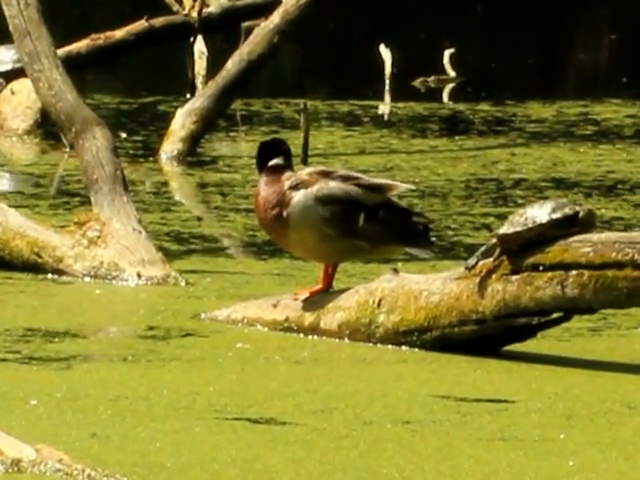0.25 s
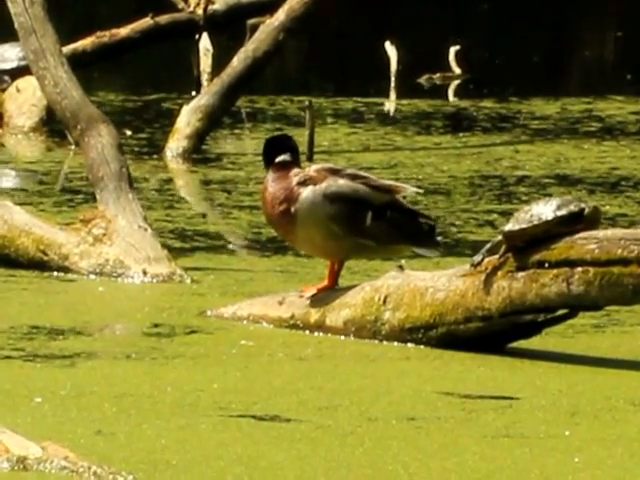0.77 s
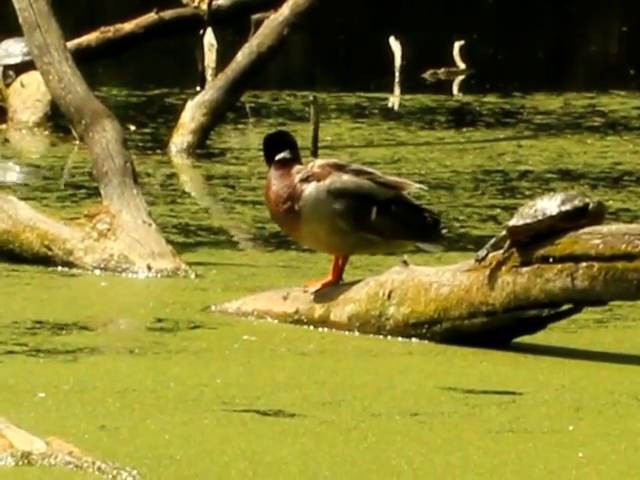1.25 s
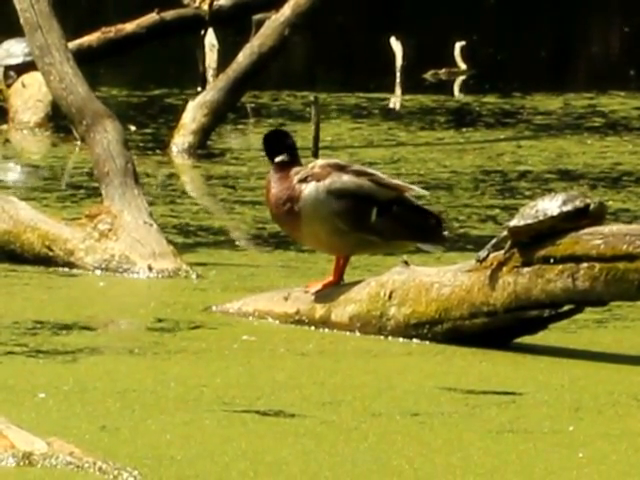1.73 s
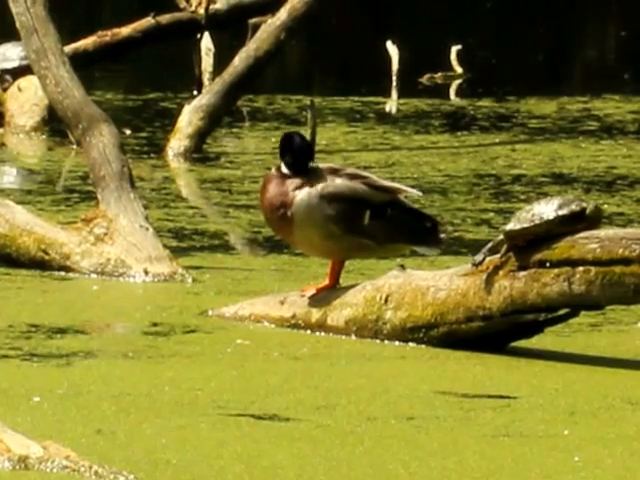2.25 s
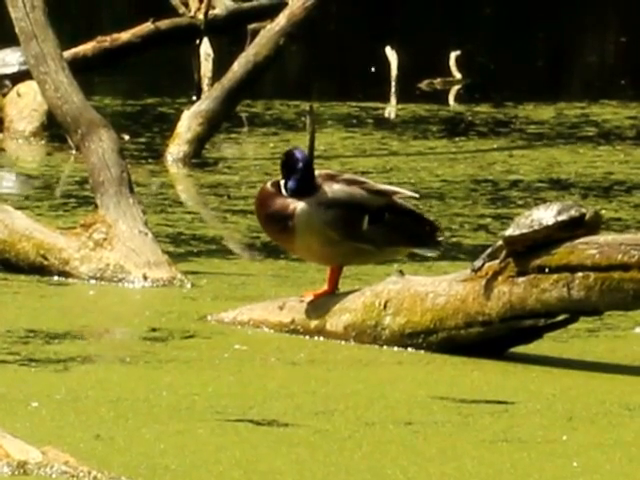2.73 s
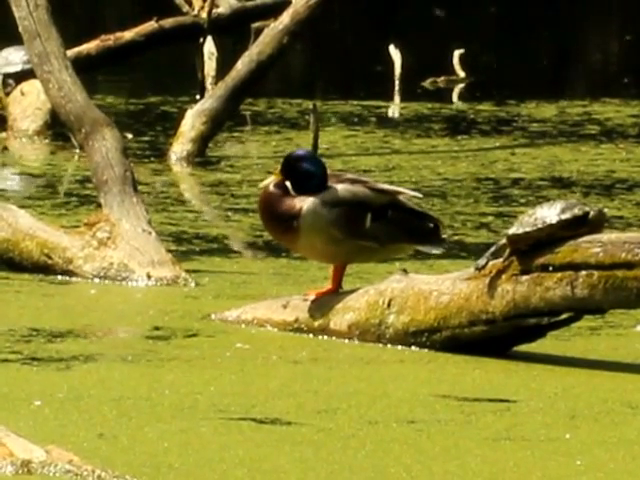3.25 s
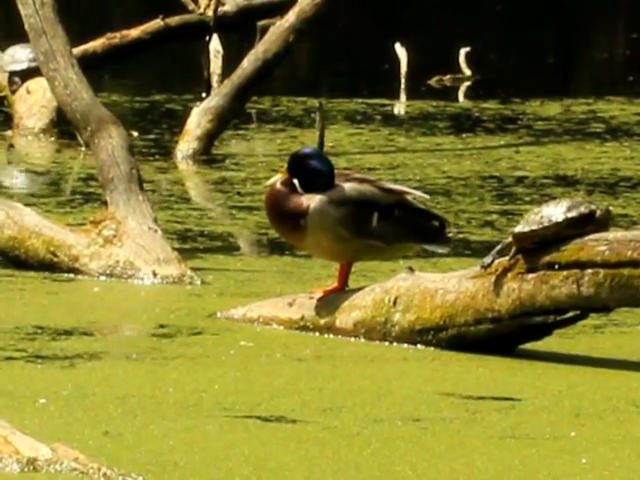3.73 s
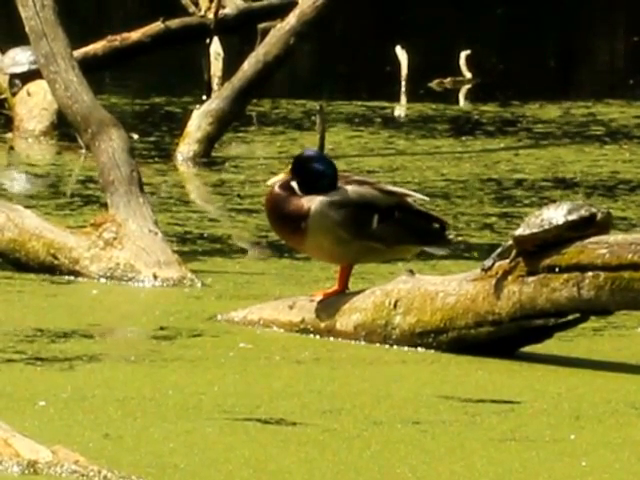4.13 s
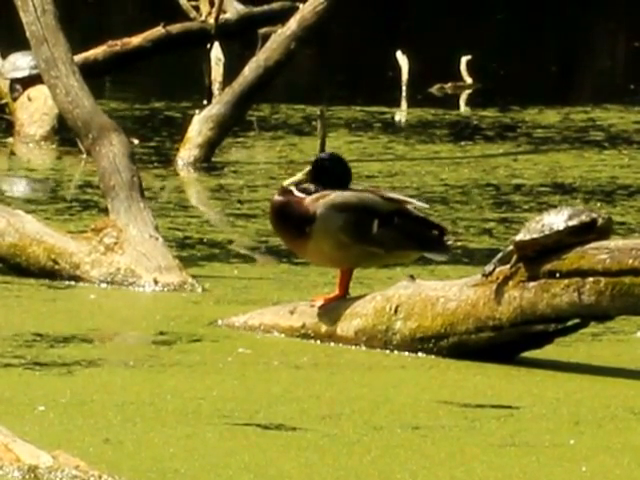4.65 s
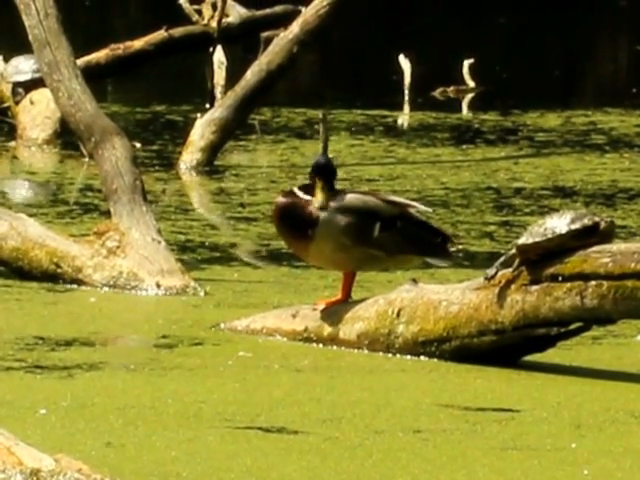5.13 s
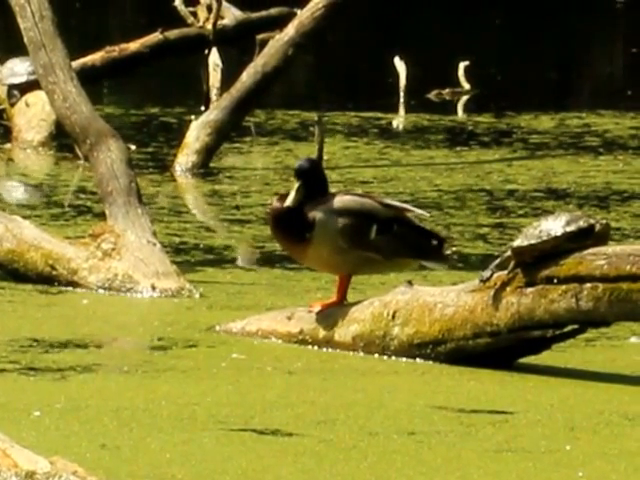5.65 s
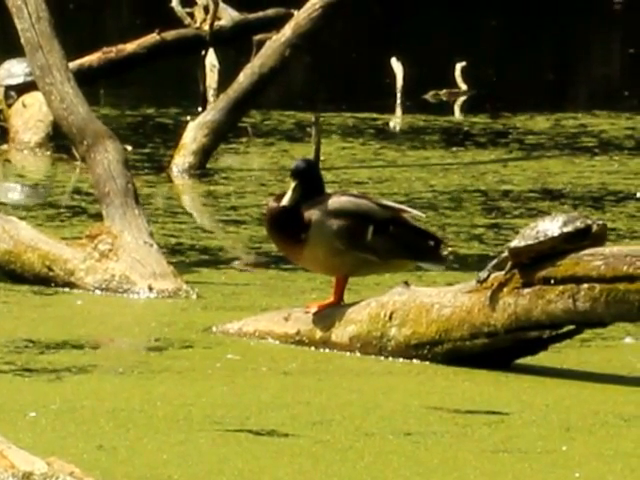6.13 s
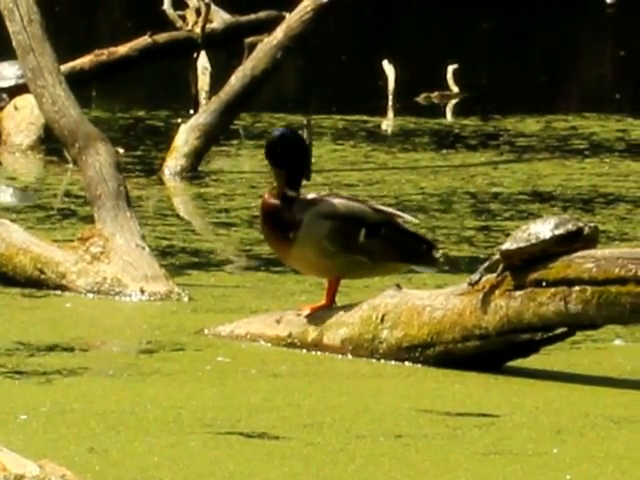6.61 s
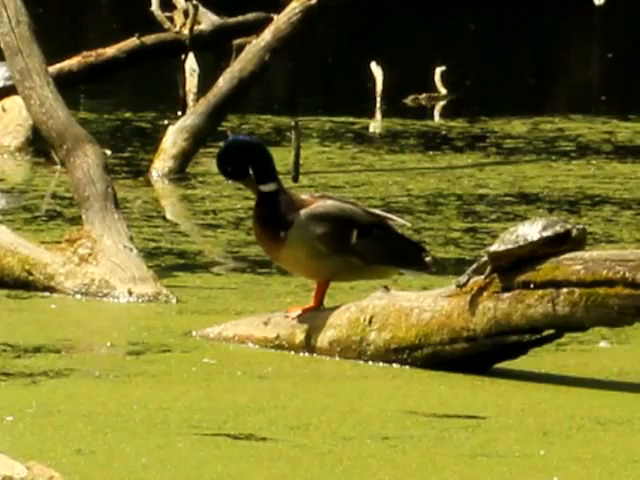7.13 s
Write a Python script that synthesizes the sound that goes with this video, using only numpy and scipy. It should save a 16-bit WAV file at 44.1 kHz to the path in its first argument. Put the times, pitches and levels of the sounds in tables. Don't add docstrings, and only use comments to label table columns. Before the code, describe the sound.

At a quiet wooded pond, several songbirds give quick bright chirps and sliding whistles in bursts with gaps between. A water bird utters a very short nasal call about once a second. A close insect begins faintly and becomes a regular dry rasp. Light wind rumbles and bumps the microphone early on, over soft leaf hiss. Notes echo briefly among trees.

```python
import sys
import numpy as np
from scipy import signal
from scipy.fft import rfft, irfft, next_fast_len
from scipy.io import wavfile
from scipy.ndimage import uniform_filter1d, map_coordinates

SR = 44100
rng = np.random.default_rng(int(sys.argv[2]) if len(sys.argv) > 2 else 0)


def to_wav(sig):
    pcm = np.clip(np.atleast_2d(sig), -1, 1) * 32767
    pcm = np.round(pcm).astype(np.int16)
    wavfile.write(sys.argv[1], SR, pcm.T)


def boost(x):
    u = np.asarray(x, float) / 20
    return 10 ** u


N = 325017


def unit(x):
    return x / np.sqrt(np.mean(x ** 2) + 1e-20)


def along(points, hz):
    f, v = np.transpose(points)
    return np.interp(np.log(hz + 1), np.log(f + 1), v)


def noise(spectrum):
    m = next_fast_len(N)
    white = rfft(rng.standard_normal(m))
    gain = boost(along(spectrum, np.fft.rfftfreq(m, 1 / SR)))
    return unit(irfft(white * gain, m)[:N])


def wobble(rate, size=N):
    knots = rng.standard_normal(int(size * rate / SR) + 4)
    return map_coordinates(knots, [np.arange(size) * rate / SR])


def silence():
    return np.zeros(N + 2 * SR)


def add(track, s, x):
    track[round((s + 1) * SR):][:len(x)] += x


def swell(u, rise, fall):
    ramp = np.minimum(u / rise, (1 - u) / fall)
    return np.sin(np.pi / 2 * np.clip(ramp, 0, 1)) ** 2


# frequency_hz [Hz], density_db [dB per Hz]
AIR_SPECTRUM = [(180, -6), (300, -11), (348, -7.5), (879, 3), (1490, -2), (1620, -3.5), (2220, -6.5),
                (3770, -1.5), (4090, -5.5), (5420, -9), (13500, -17.5), (15600, -21.5)]


def leaf_hiss():
    return boost(-70 + 0.5 + 0.4 * wobble(2.4)) * noise(AIR_SPECTRUM)


# time_s [s], level_db [dB]
GUST_LEVELS = [
    (0.0, -62),
    (0.1, -65),
    (1.39, -67),
    (1.641, -72.5),
    (4.719, -69),
    (7.12, -75),
    (7.37, -67),
]
# frequency_hz [Hz], density_db [dB per Hz]
RUMBLE_SPECTRUM = [(13, -49.5), (22, -45.5), (31, -12.5), (76, 1), (144, 0.5), (183, -2), (330, -22),
                   (430, -62), (730, -120)]


def wind_rumble():
    time_s, level_db = np.transpose(GUST_LEVELS)
    course = boost(np.interp(np.arange(N) / SR, time_s, level_db) - 0.5)
    eddies = boost(3 * wobble(12))
    return course * unit(eddies * noise(RUMBLE_SPECTRUM))


# centre_s [s], peak_db [dB], pitch_hz [Hz]
PUFFS = [(0.012, -57, 109), (0.041, -38, 105), (0.135, -41.5, 99), (0.209, -49.5, 162),
         (0.2662, -35.5, 127), (0.298, -44, 114), (0.387, -44.5, 118.3), (0.423, -43.5, 115),
         (0.524, -47, 100), (0.614, -50.5, 110), (0.6476, -38, 132), (0.7388, -49, 102),
         (0.7555, -49, 110.4), (0.857, -42.5, 112), (0.877, -43.5, 122), (1.433, -39.5, 120),
         (1.4456, -36.5, 136), (1.462, -44.5, 107), (3.375, -50, 95), (3.695, -50, 92), (3.732, -51, 119),
         (3.751, -47, 105), (3.764, -47.5, 136)]


def wind_thumps():
    out = silence()
    t = np.arange(-SR // 40, SR // 40) / SR
    for s, db, hz in PUFFS:
        phase = rng.uniform(0, 2 * np.pi)
        pulse = np.exp(-(t * hz / 0.55) ** 2) * np.cos(2 * np.pi * hz * t + phase)
        add(out, s + t[0], boost(db) * pulse)
    return out[SR:SR + N]


# sharp_stroke_s [s], sharp_db [dB], soft_db [dB]
RASP_CYCLES = [
    (1.374, -63, -74),
    (1.986, -55, -65),
    (2.611, -51, -65),
    (3.21, -50.5, -61),
    (3.817, -48.5, -62),
    (4.443, -48, -60.5),
    (5.075, -44.5, -56.5),
    (5.712, -46, -54.5),
    (6.307, -44.5, -55.5),
    (6.919, -45.5, -52.5),
]
# frequency_hz [Hz], density_db [dB per Hz]
WING_SPECTRUM = [(2650, -53.5), (4500, -27), (4890, -24.5), (6250, -12.5), (7080, -11), (11200, -3.5),
                 (13700, -3.5), (15600, -7)]


def insect():
    t, level = np.arange(N) / SR, np.zeros(N)

    def stroke(s, rise, fall, edge=2.5):
        return np.exp(-np.abs((t - s) / np.where(t < s, rise, fall)) ** edge)

    cycles_s = np.append(np.diff(np.transpose(RASP_CYCLES)[0]), 0.626)
    for (s, db, soft_db), cycle_s in zip(RASP_CYCLES, cycles_s):
        sharp = stroke(s, 0.0097, 0.0052, edge=1.7) + boost(-19.5) * stroke(s, 0.025, 0.052)
        level += boost(db) * sharp
        level += boost(soft_db) * stroke(s - 0.096, 0.03, 0.027)
        level += boost(soft_db - 4) * stroke(s + 0.492 * cycle_s, 0.037, 0.022)
        level += boost(db - 23.0) * stroke(s + 0.15, 0.075, 0.068)
    ticks = boost(3.7 * wobble(1200) + 1.4 * wobble(150))
    return level * unit(ticks * noise(WING_SPECTRUM))


# frequency_hz [Hz], t60_s [s]
TREE_DECAY = [(800, 1.24), (3000, 1.15), (6000, 0.66), (10000, 0.42)]


def woods(x, direct_db, near_db, near_t60, wet_db):
    out = boost(direct_db) * np.pad(x, (0, 2 * SR))
    step = SR // 4
    fade = np.sqrt(np.hanning(2 * step + 1)[:-1])
    for i in range(0, len(x) - 2 * step, step):
        hz, t, z = signal.stft(rng.standard_normal(SR * 3 // 2), SR, nperseg=256)
        late = boost(wet_db - 60 * t / along(TREE_DECAY, hz)[:, None]) * (1 - np.exp(-t / 0.0021))
        early = boost(near_db - 60 * t / near_t60)
        trunks = uniform_filter1d(rng.standard_normal(z.shape), size=9, axis=0)
        trunks = unit(uniform_filter1d(trunks, size=4, axis=1))
        z = z * boost(2.5 * trunks - 1)
        tail = signal.istft(z * (late + early), SR, nperseg=256)[1] / np.sqrt(SR)
        echo = signal.fftconvolve(fade * x[i:i + 2 * step], tail)
        out[i + 60:][:len(echo)] += echo
    return out[SR:SR + N]


# start_s [s], length_s [s], held_hz [Hz], peak_db [dB]
CALLS = [
    (-.09, 0.056, 859, -33),
    (0.976, 0.066, 883, -28.5),
    (2.062, 0.073, 888.4, -29),
    (3.327, .051, 886, -31),
    (4.1, 0.055, 879, -31.5),
    (5.041, 0.076, 908.5, -27),
    (6.263, 0.026, 836, -34.5),
]
# multiple [of the pitch], level_db [dB]
THROAT_PARTIALS = [(1, -11.5), (2, -6), (3, -10), (4, -7.5), (5, -15), (6, -14.5), (7, -19), (8, -21.5),
                   (9, -22.5), (10, -25), (11, -28), (12, -60)]


def waterbird():
    out = silence()
    lead = round(0.015 * SR)
    for s, length, held, db in CALLS:
        slope_db = -473.5 * (0.078 - length)
        u = np.linspace(0, 1, round(length * SR))
        progress = np.clip((u * length - max(length - 0.06, 0)) / .054, 0, 1)
        drop = swell(progress / 2, 0.544, 0.64)
        hz = held + (806.6 - held) * drop
        phase = 2 * np.pi * np.cumsum(hz) / SR
        stack = np.zeros(len(u))
        for k, level_db in THROAT_PARTIALS:
            above = max(k - 2, 0)
            fade_db = slope_db * (above ** .7 + .05 * (k < 2)) - 26 * drop * above ** .5
            stack += boost(level_db + fade_db) * np.sin(k * phase + k * k)
        add(out, s, boost(db) * swell(u, 0.15, 0.24) * stack)
        add(out, s - .013, boost(db - 22) * np.hanning(lead) * stack[:lead])
    return out


def bowed(rows, bow):
    return [(s, length, hz * (1 - bow), hz, hz * (1 - bow), db, 1) for s, length, hz, db in rows]


def slid(rows, early):
    return [(s, length, a, a + early * (c - a), c, db, 1) for s, length, a, c, db in rows]


def unsteadiness():
    return wobble(92.5, size=N + 2 * SR)


def sing(notes, attack, waver, unsteady):
    out = silence()
    for s, length, a, b, c, db, haste in notes:
        u = np.linspace(0, 1, round(length * SR))
        v = u ** haste
        hz = a * (1 - v) * (1 - 2 * v) + 4 * b * v * (1 - v) + c * v * (2 * v - 1)
        shake = np.roll(unsteady, -round(s * SR + a * 10))[:len(u)]
        phase = 2 * np.pi * np.cumsum(hz * (1 + waver * shake)) / SR
        tone = np.sin(phase) + boost(-52.5) * np.sin(2 * phase)
        edge = min(attack / length + .1, .45)
        glide = np.abs(np.gradient(np.log(hz))) * SR
        rest_db = -np.minimum(.3 * (glide - glide.min()), 8)
        add(out, s - attack / 4, boost(db + 2.0 + rest_db) * swell(u, edge, edge) * tone)
    return out


def flutter(track, depth_db):
    return track * boost(depth_db * wobble(70, size=len(track)))


# start_s [s], length_s [s], pitch_hz [Hz], peak_db [dB]
DISTANT_NOTES = [(-.05, 0.11, 3400, -58.5), (3.65, 0.05, 2530, -63), (3.636, .05, 4260, -41.5),
                 (4.72, .15, 4330, -61), (7.0, .06, 4400, -58), (3.82, 0.087, 2585, -72),
                 (3.958, 0.027, 3190, -49), (3.29, .06, 6300, -74), (3.48, 0.11, 3100, -62),
                 (4.236, 0.023, 14400, -63), (.31, 0.15, 2550, -76), (.565, 0.09, 7470, -69),
                 (2.285, .05, 1270, -64), (2.39, 0.17, 3436, -62), (2.535, 0.047, 4830, -67.5),
                 (2.552, 0.038, 4390, -63), (.92, 0.066, 4030, -58.5), (3.005, 0.028, 6700, -64),
                 (3.124, 0.02, 6900, -67), (3.14, 0.064, 4150, -69), (4.218, 0.054, 7050, -64),
                 (6.22, 0.088, 3480, -72.5), (6.69, 0.026, 3230, -74), (3.005, .085, 8000, -70),
                 (3.228, .05, 3164, -56), (3.3, .05, 3126, -66), (7.14, .045, 3690, -60),
                 (3.26, 0.045, 8400, -59.5), (3.35, 0.021, 6910, -58), (3.36, 0.12, 3720, -62.5),
                 (3.348, 0.022, 2570, -60), (3.36, 0.13, 2980, -68), (6.2, .07, 4120, -75.5),
                 (6.36, 0.11, 3590, -75), (3.461, 0.12, 2552, -59.5), (3.839, 0.026, 3200, -60),
                 (4.6, 0.19, 4020, -77), (4.6, 0.26, 3785, -57), (6.091, 0.048, 3770, -70),
                 (6.099, 0.027, 4090, -64), (6.34, 0.071, 3710, -69), (6.42, 0.056, 3750, -68.5),
                 (6.645, 0.044, 2240, -72)]
# start_s [s], length_s [s], start_hz [Hz], end_hz [Hz], peak_db [dB]
HAZY_SLIDES = [
    (2.632, .11, 5480, 5050, -69),
    (2.82, .12, 4600, 3800, -65),
    (3.862, .045, 4650, 4200, -34),
    (.5, .23, 3690, 3650, -58),
    (.55, .23, 3940, 3960, -60),
    (.58, .2, 4820, 4790, -68),
    (7.065, .11, 8450, 8520, -60),
]


def distant_birds():
    notes = bowed(DISTANT_NOTES, bow=.004) + slid(HAZY_SLIDES, early=.48)
    return flutter(sing(notes, attack=.012, waver=.016, unsteady=unsteadiness()), 3)


# start_s [s], length_s [s], centre_hz [Hz], swing_hz [Hz], peak_db [dB]
BUZZ_TRILLS = [
    (0.137, 0.038, 7990, 700, -49.5),
    (1.083, 0.085, 8390, 470, -51),
]


def buzzing_trills(unsteady):
    out = silence()
    for s, length, centre, swing, db in BUZZ_TRILLS:
        u = np.linspace(0, 1, round(length * SR))
        uneven = 1.4 * unsteady[round(s * SR):][:len(u)]
        hz = centre + swing * np.sin(2 * np.pi * 110 * length * u + uneven)
        add(out, s, boost(db) * swell(u, 0.16, 0.23) * np.sin(2 * np.pi * np.cumsum(hz) / SR))
    return out


# start_s [s], length_s [s], start_hz [Hz], end_hz [Hz], peak_db [dB]
EDGE_SLIDES = [(.036, 0.013, 3370, 3425, -42), (.098, 0.019, 3440, 3450, -47.5),
               (.197, 0.0083, 5380, 5420, -48), (.369, 0.0093, 4650, 4820, -37),
               (.366, 0.0074, 3910, 4140, -31.5), (.375, .013, 4080, 3950, -30),
               (.384, .023, 3740, 3640, -32), (.441, 0.0084, 3800, 3580, -33),
               (.448, .014, 3400, 3200, -32), (.476, .008, 3660, 3640, -40),
               (3.626, .012, 5010, 3950, -36.5), (3.976, .026, 3900, 3980, -34),
               (3.978, 0.026, 3700, 3760, -35), (3.998, 0.03, 3910, 2260, -35.5),
               (4.02, 0.015, 2320, 2380, -48), (4.098, 0.037, 2170, 3090, -46),
               (3.615, .022, 5750, 5550, -40), (.204, .016, 6850, 6550, -42),
               (4.128, .055, 3050, 2900, -39), (.823, .014, 4480, 4400, -52), (.822, .02, 4000, 3800, -50),
               (6.957, .013, 4250, 4050, -35.5), (6.978, .009, 4100, 3800, -42),
               (6.985, .012, 3520, 3440, -51), (4.267, .035, 5090, 4987, -33.5),
               (4.267, .05, 4800, 4703, -38.5)]


def edge_notes():
    return slid(EDGE_SLIDES, early=.58)


# start_s [s], length_s [s], pitch_hz [Hz], peak_db [dB]
LEVEL_NOTES = [(.134, 0.009, 8560, -42.5), (4.19, .06, 3100, -48.5), (4.18, .07, 2830, -50),
               (.212, .03, 8350, -50), (.64, 0.098, 2830, -53), (3.742, .016, 4950, -46),
               (4.135, .05, 3170, -44), (3.049, 0.02, 4760, -49), (.853, 0.064, 8160, -39),
               (4.577, 0.018, 2766, -50), (.855, 0.14, 3266, -43), (1.0, 0.04, 8120, -36.5),
               (1.065, 0.045, 4395, -48), (1.068, 0.018, 8040, -43), (1.16, 0.134, 4410, -51),
               (1.31, 0.015, 2738, -43.5), (1.58, 0.067, 4400, -48.5), (1.685, 0.03, 4376, -49)]
# start_s [s], length_s [s], lowest_hz [Hz], peak_db [dB]
DIP_NOTES = [(.1, 0.033, 8125, -40), (.135, 0.016, 7790, -38.5), (.94, 0.02, 7850, -44.5),
             (1.35, 0.078, 2480, -55.5), (2.215, 0.08, 2820, -61.5), (2.75, 0.08, 7930, -65.5),
             (3.38, 0.054, 3075, -55), (6.455, 0.14, 2300, -73), (6.58, 0.1, 3750, -64),
             (6.945, 0.016, 4180, -47)]
# start_s [s], length_s [s], top_hz [Hz], peak_db [dB]
ARCH_NOTES = [
    (3.285, .056, 7960, -52),
    (3.767, 0.041, 6340, -42),
    (3.188, 0.055, 2800, -60.5),
]
# start_s [s], length_s [s], start_hz [Hz], end_hz [Hz], peak_db [dB]
HOOK_SLIDES = [
    (.203, 0.032, 6820, 6480, -41),
    (3.515, 0.06, 7240, 6555, -42.5),
    (3.613, 0.009, 6300, 5620, -36),
]
# start_s [s], length_s [s], start_hz [Hz], end_hz [Hz], peak_db [dB]
SETTLING_SLIDES = [(.083, .019, 7480, 8300, -48), (.475, .17, 3042, 2796, -43),
                   (.832, 0.037, 3570, 3330, -46), (3.47, 0.052, 8680, 7180, -49.5),
                   (3.72, 0.027, 3720, 3520, -57), (4.264, 0.008, 7320, 4750, -24),
                   (4.418, 0.051, 3815, 4100, -28.5), (6.786, 0.05, 4410, 3850, -61),
                   (6.68, .38, 9000, 8330, -60), (7.03, 0.051, 4220, 4500, -62),
                   (7.338, 0.028, 4350, 4660, -52)]
# start_s [s], length_s [s], start_hz [Hz], end_hz [Hz], peak_db [dB]
EVEN_SWEEPS = [(1.275, 0.039, 3210, 3075, -48), (1.39, 0.055, 3914, 3510, -47),
               (1.515, 0.031, 3880, 3510, -46.5), (1.515, 0.043, 4580, 4430, -59),
               (1.41, 0.027, 4770, 5530, -67), (2.012, 0.019, 5100, 6700, -64),
               (3.064, 0.018, 4400, 2780, -55), (3.062, 0.025, 2270, 1700, -61),
               (.206, 0.0097, 6800, 8200, -54), (2.35, 0.11, 3690, 3430, -61),
               (.335, 0.045, 4100, 3760, -66), (.61, 0.14, 6950, 6590, -60),
               (.98, 0.032, 8700, 7960, -51.5), (2.8, 0.15, 3784, 3440, -58),
               (2.98, 0.046, 3160, 2560, -54.5), (3.626, 0.0076, 5660, 4140, -42),
               (3.834, .062, 5150, 4150, -35), (3.742, 0.01, 4540, 5960, -41),
               (3.747, 0.018, 5810, 6680, -39.5), (3.776, 0.011, 6300, 3420, -33.5),
               (3.968, 0.021, 3170, 4030, -36), (.957, 0.012, 8000, 9800, -55),
               (4.248, 0.01, 7110, 8460, -51.5), (4.335, .03, 3230, 3420, -44),
               (4.359, 0.01, 3800, 6400, -35), (4.562, 0.031, 3926, 2523, -45.5),
               (6.807, 0.017, 5240, 4700, -54), (6.827, 0.025, 5150, 4320, -46)]
# start_s [s], length_s [s], start_hz [Hz], end_hz [Hz], peak_db [dB]
LATE_SLIDES = [
    (.2, 0.009, 5300, 8000, -47),
    (4.46, 0.11, 4200, 3953, -32),
    (3.5, 0.052, 7340, 7550, -48.5),
]


def thicket_birds():
    notes = bowed(LEVEL_NOTES, bow=0.0048) + bowed(DIP_NOTES, bow=-0.044) + bowed(ARCH_NOTES, bow=0.1)
    notes += slid(HOOK_SLIDES, early=1.15) + slid(SETTLING_SLIDES, early=.74)
    notes += slid(EVEN_SWEEPS, early=.45) + slid(LATE_SLIDES, early=0.277)
    notes += [(*note, db - 5.5, haste) for *note, db, haste in edge_notes()]
    unsteady = unsteadiness()
    voices = sing(notes, attack=.008, waver=.007, unsteady=unsteady) + buzzing_trills(unsteady)
    return flutter(voices, 1.5)


# start_s [s], length_s [s], top_hz [Hz], peak_db [dB]
ARCHED_CHIPS = [
    (3.04, 0.043, 2320, -50.5),
    (6.992, 0.038, 7970, -58),
    (7.103, 0.046, 8050, -58),
    (7.234, 0.045, 7550, -49.5),
]
# start_s [s], length_s [s], top_hz [Hz], peak_db [dB]
STEEP_CHIPS = [
    (2.91, 0.054, 8170, -64),
    (3.012, 0.057, 7640, -64),
    (3.047, .03, 4650, -51),
    (3.131, 0.061, 7550, -58.5),
]


def chipping_birds():
    notes = [(s, length, .5 * hz, .98 * hz, .86 * hz, db, .6) for s, length, hz, db in STEEP_CHIPS]
    chatter = [(3.25 + k * .053, .024, 4300, 3950, -60) for k in range(7)]
    notes += bowed(ARCHED_CHIPS, bow=.22) + slid(chatter, early=.4)
    return flutter(sing(notes, attack=.005, waver=.016, unsteady=unsteadiness()), 2.5)


# start_s [s], length_s [s],
# pitch_hz [Hz], peak_db [dB]
HELD_WHISTLES = [(.012, 0.088, 4102, -53.5), (.21, 0.018, 2030, -58), (.291, 0.052, 5870, -30.5),
                 (1.463, .023, 3247, -32.5), (1.25, 0.018, 4043, -28), (2.15, 0.014, 1216, -56.5),
                 (3.092, .011, 1470, -58.5), (4.52, 0.046, 7900, -75), (4.72, 0.19, 7900, -79.5),
                 (5.855, 0.032, 7820, -70), (5.882, 0.021, 8240, -69), (6.197, 0.018, 3560, -58.5),
                 (6.374, 0.043, 2910, -69), (6.345, .075, 4860, -74), (7.293, 0.08, 3604, -36.5),
                 (7.256, .085, 4150, -45)]
# start_s [s], length_s [s], top_hz [Hz], peak_db [dB]
BENT_WHISTLES = [
    (1.9, .068, 4110, -30.5),
    (2.04, 0.066, 4120, -31.5),
    (2.19, 0.055, 4100, -41),
]
# start_s [s], length_s [s], start_hz [Hz], end_hz [Hz], peak_db [dB]
OPEN_SLIDES = [(.283, 0.016, 4360, 5925, -25.5), (.848, 0.0081, 7100, 8000, -42.5),
               (1.293, 0.036, 4110, 3860, -35), (1.363, 0.017, 4020, 3670, -31),
               (1.45, 0.0273, 3700, 3420, -35), (1.262, 0.023, 3620, 3110, -39.5),
               (1.595, 0.0212, 3570, 3293, -36), (1.695, 0.11, 2170, 2083, -62),
               (2.345, .04, 1020, 760, -62), (7.192, 0.06, 4210, 4050, -27)]
# start_s [s], length_s [s], start_hz [Hz], end_hz [Hz], peak_db [dB]
OPEN_TAILS = [(.215, 0.04, 4220, 2520, -64), (2.098, 0.019, 3920, 3760, -35),
              (1.528, 0.027, 3460, 2570, -55), (1.61, 0.02, 2952, 2890, -40),
              (1.68, 0.011, 2770, 2500, -45.5), (1.86, 0.07, 3250, 3720, -64),
              (2.02, 0.017, 2800, 3940, -64)]


def open_songbirds():
    notes = bowed(HELD_WHISTLES, bow=0.013) + slid(OPEN_SLIDES, early=.8) + slid(OPEN_TAILS, early=0.22)
    notes += bowed(BENT_WHISTLES, bow=.045) + edge_notes()
    return flutter(sing(notes, attack=0.00491, waver=0.004, unsteady=unsteadiness()), .8)


def scene():
    air = leaf_hiss()
    near = open_songbirds()
    far = thicket_birds() + distant_birds()
    near += chipping_birds()
    birds = woods(near, direct_db=0, near_db=3, near_t60=.25, wet_db=1)
    birds += woods(far, direct_db=-4.0, near_db=17, near_t60=0.15, wet_db=7.0)
    birds += woods(waterbird(), direct_db=-2.0, near_db=9.5, near_t60=0.17, wet_db=-1.0)
    return (birds + insect() + wind_rumble() + wind_thumps() + air)[None]


def low_pass(x):
    return signal.sosfilt(signal.butter(12, 15760, fs=SR, output="sos"), x)


def record(dry):
    low_cut = signal.butter(2, 40, "high", fs=SR, output="sos")
    mix = signal.sosfilt(low_cut, dry)
    return low_pass(mix)


dry = scene()
out = record(dry)
to_wav(out)
```